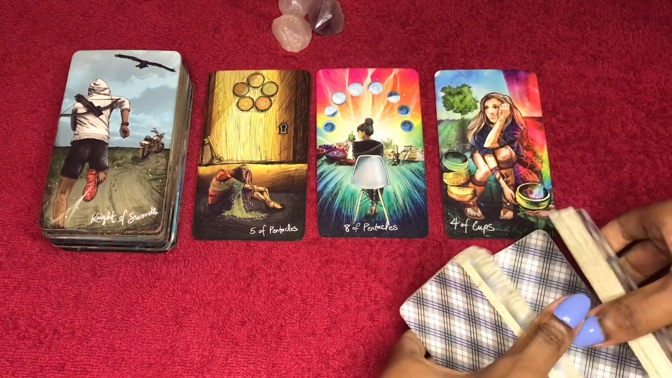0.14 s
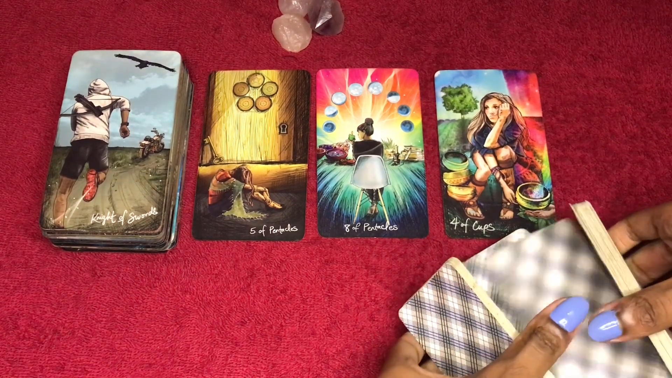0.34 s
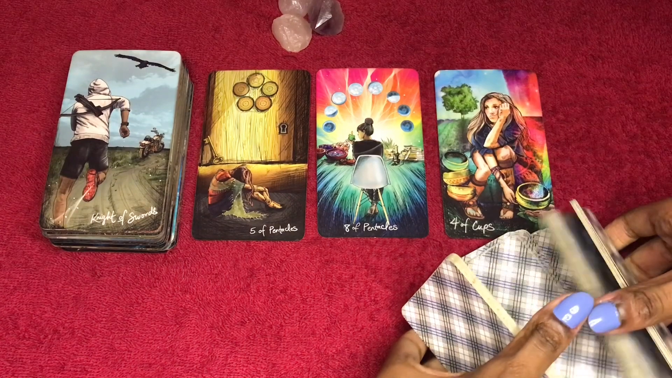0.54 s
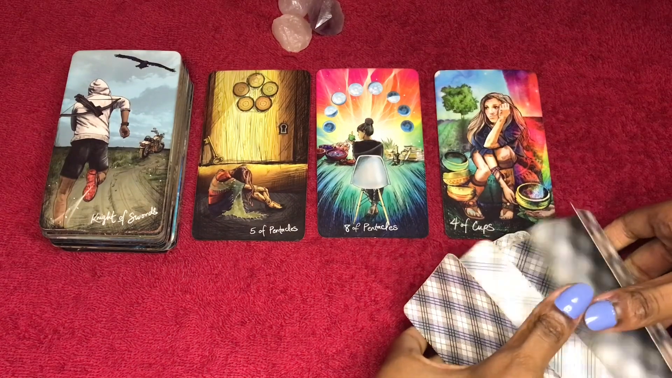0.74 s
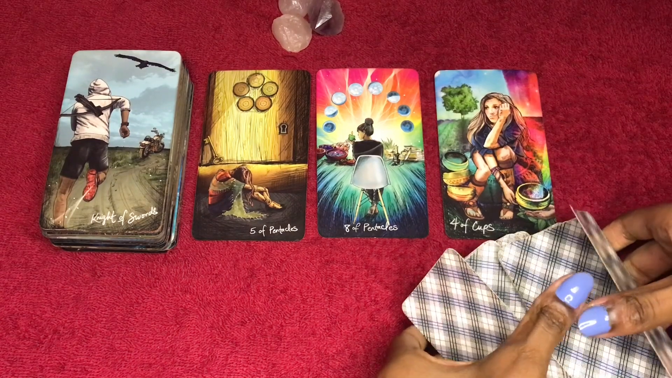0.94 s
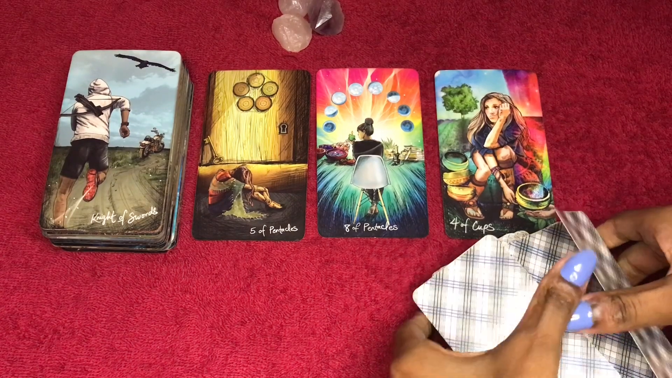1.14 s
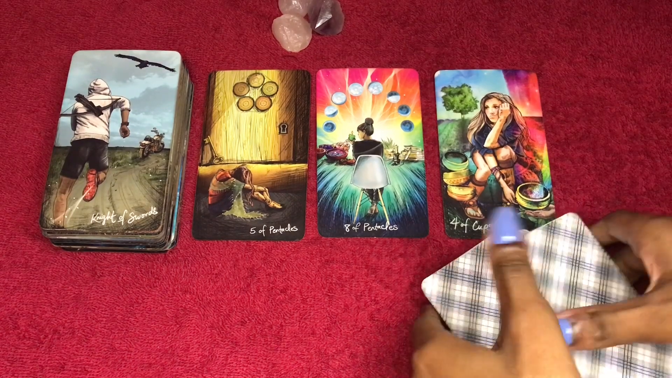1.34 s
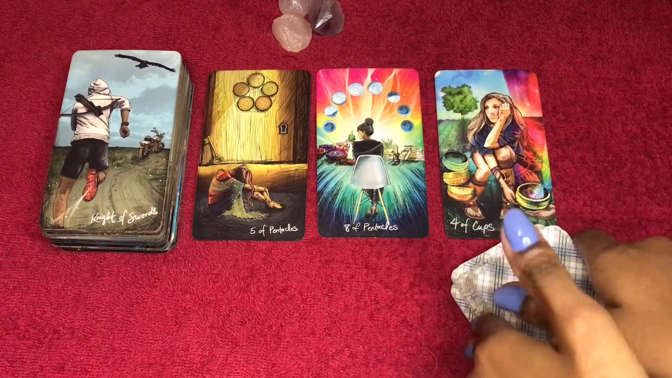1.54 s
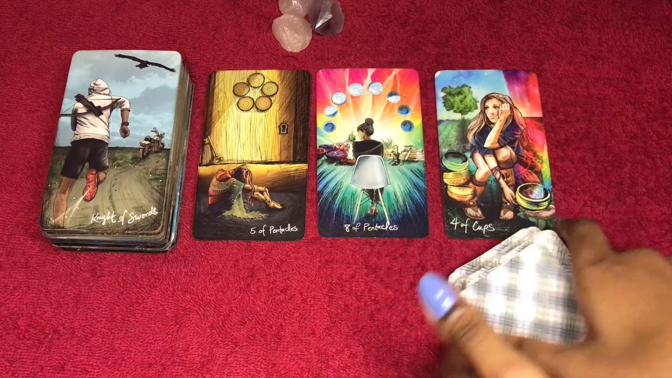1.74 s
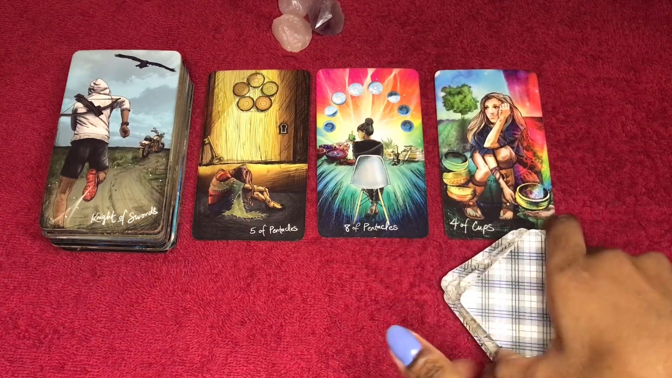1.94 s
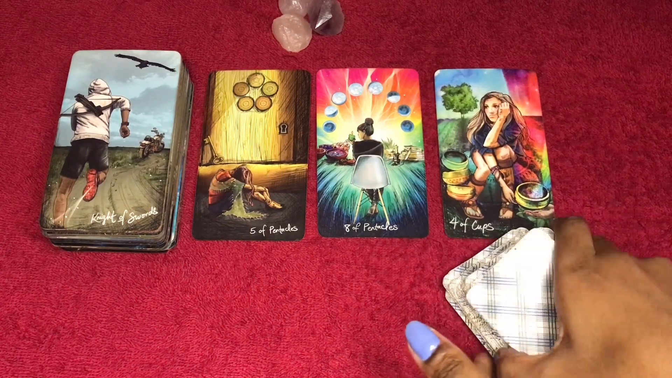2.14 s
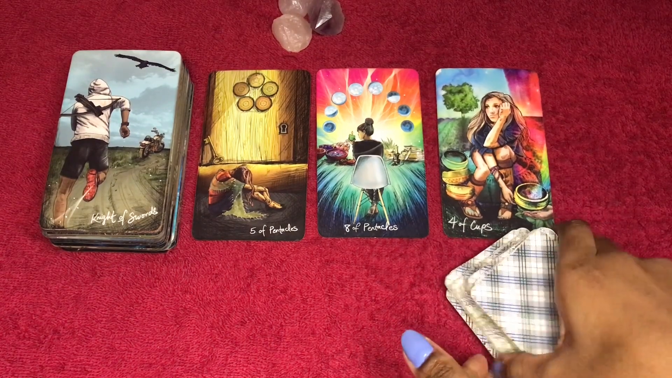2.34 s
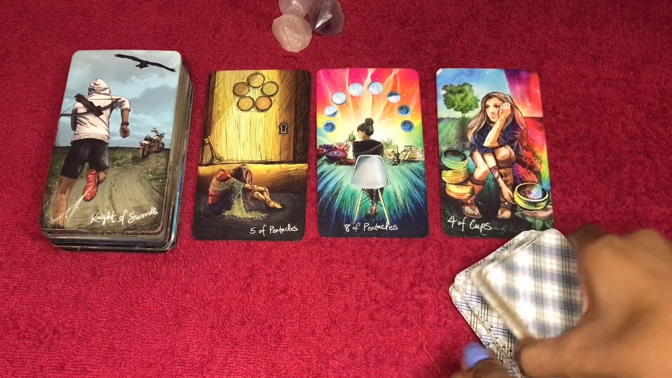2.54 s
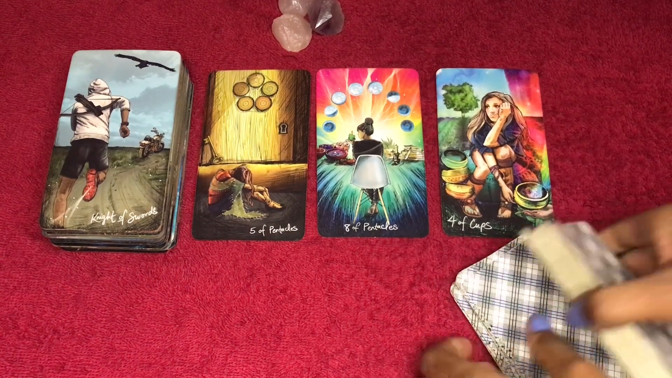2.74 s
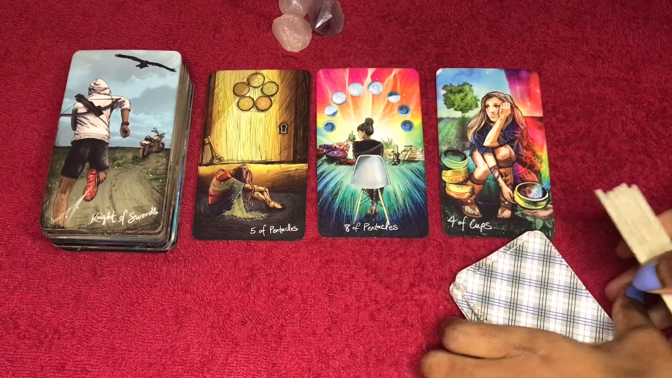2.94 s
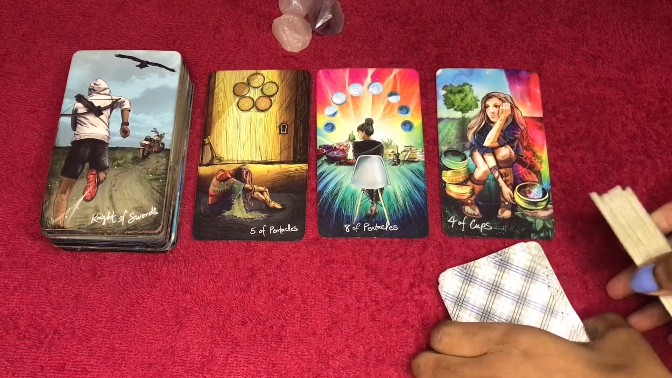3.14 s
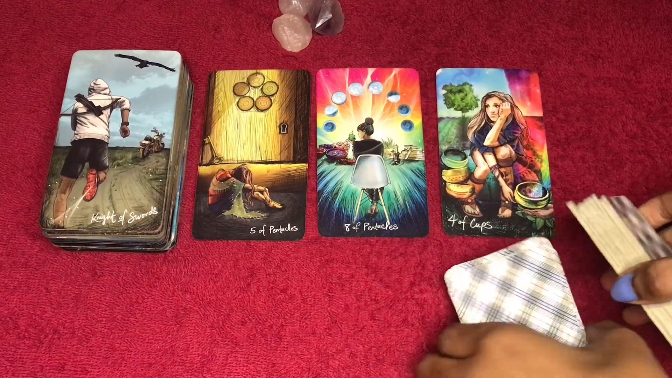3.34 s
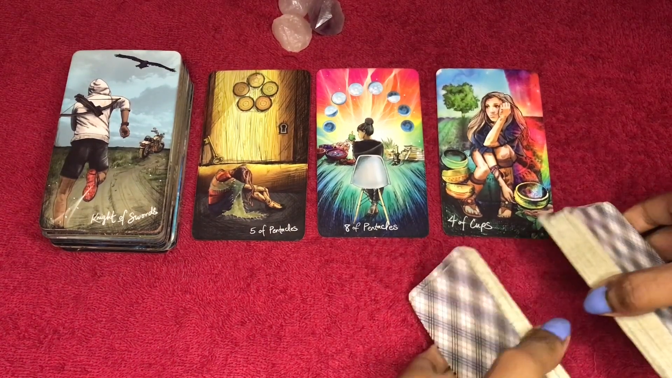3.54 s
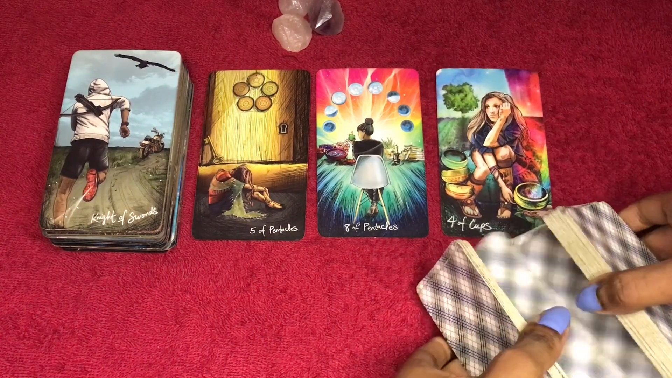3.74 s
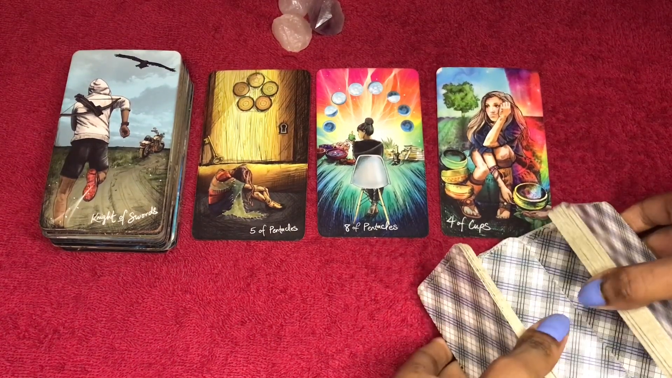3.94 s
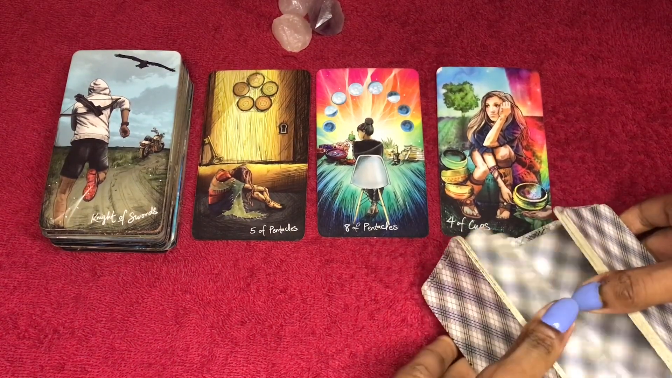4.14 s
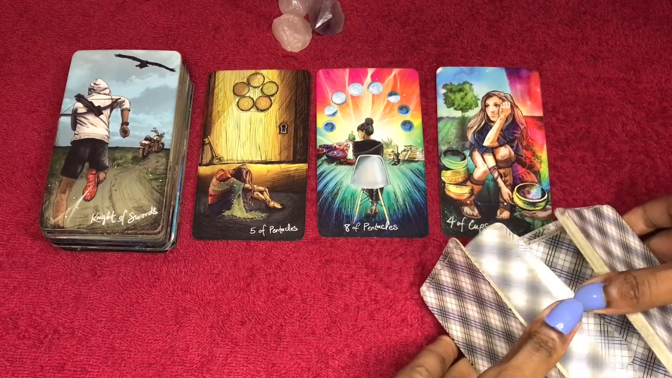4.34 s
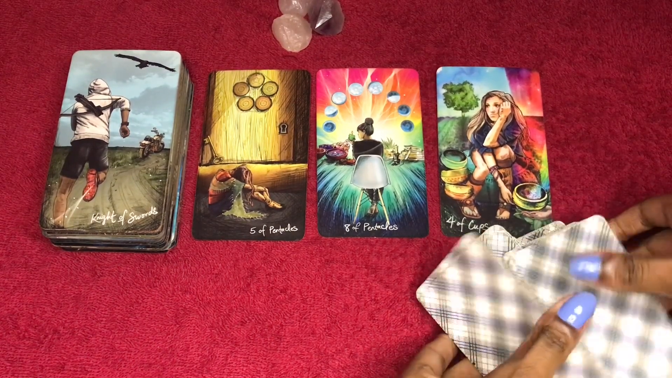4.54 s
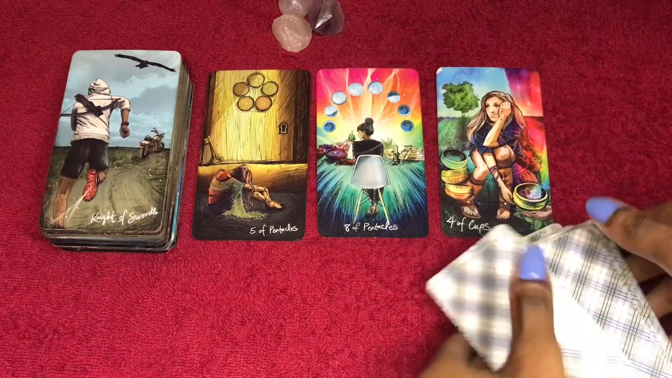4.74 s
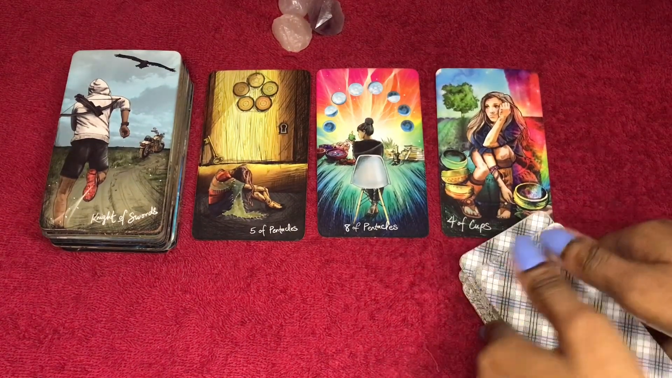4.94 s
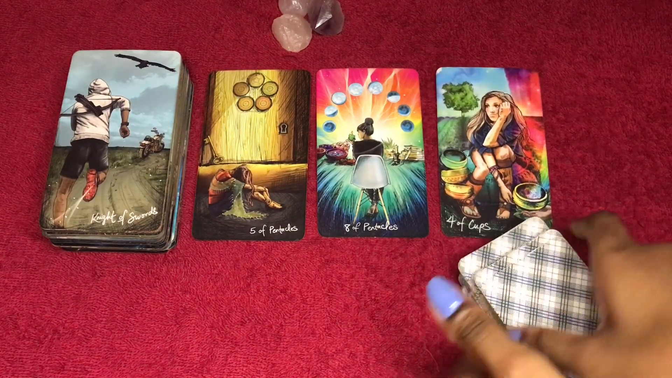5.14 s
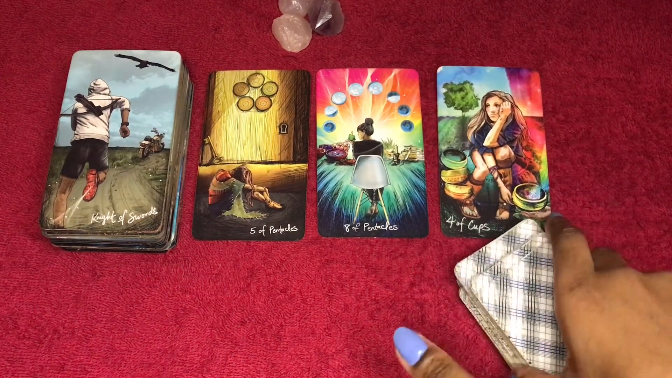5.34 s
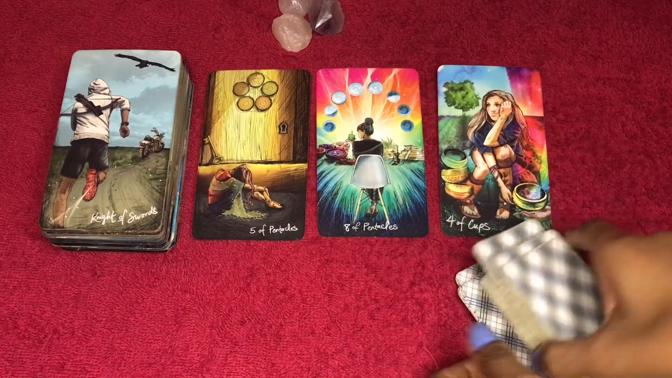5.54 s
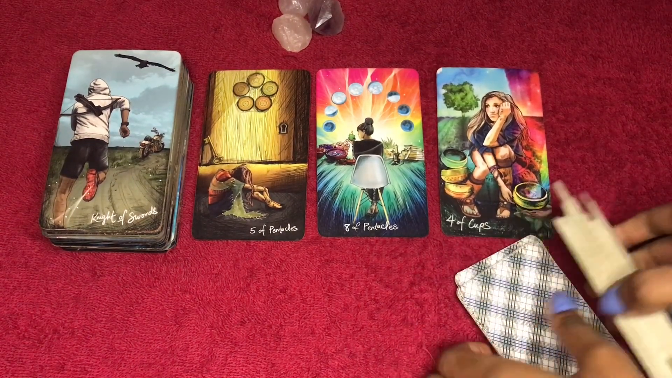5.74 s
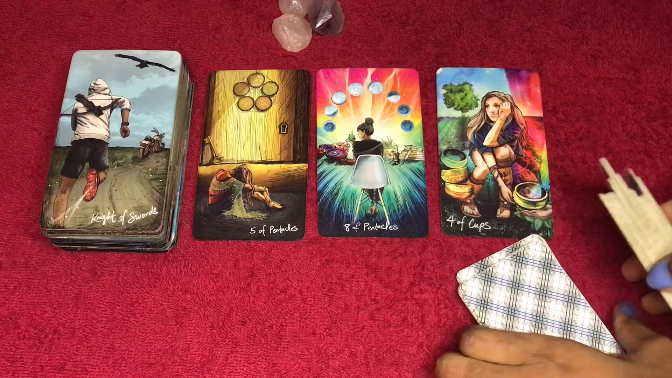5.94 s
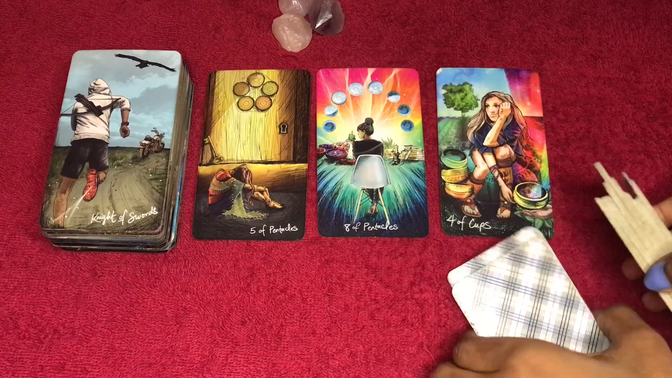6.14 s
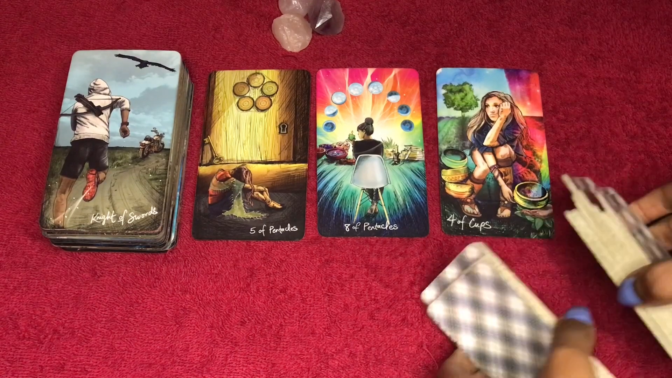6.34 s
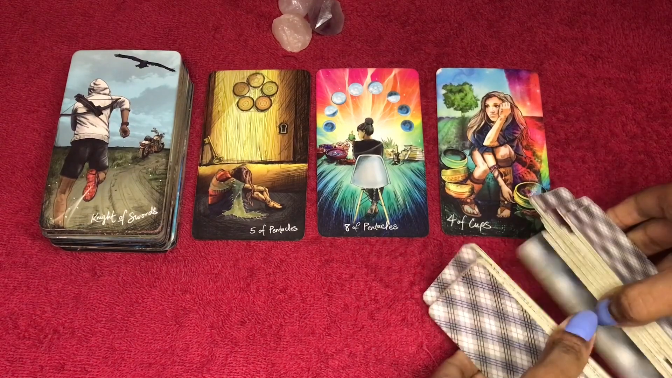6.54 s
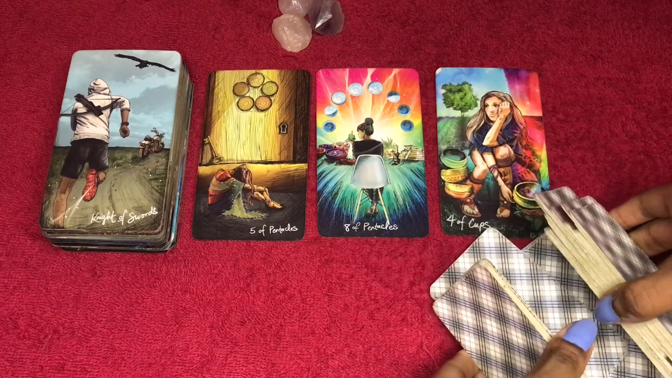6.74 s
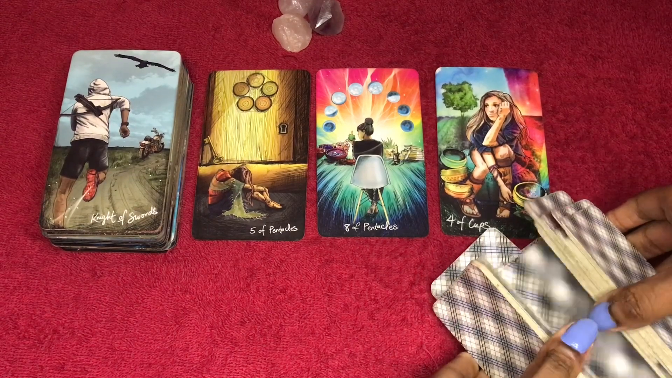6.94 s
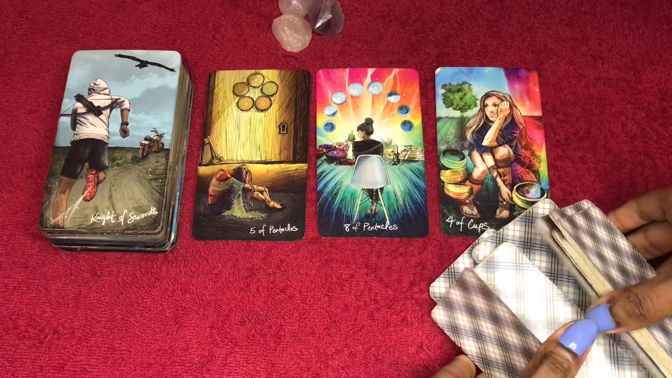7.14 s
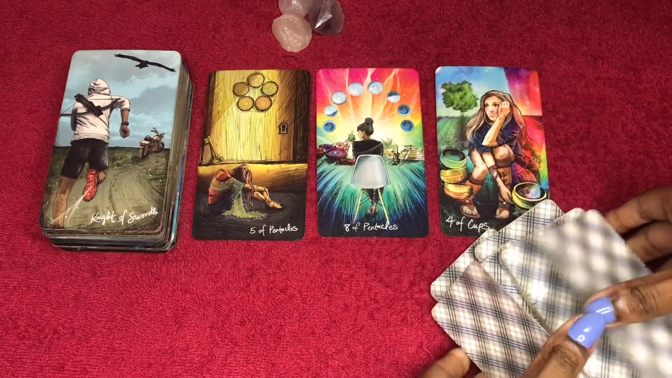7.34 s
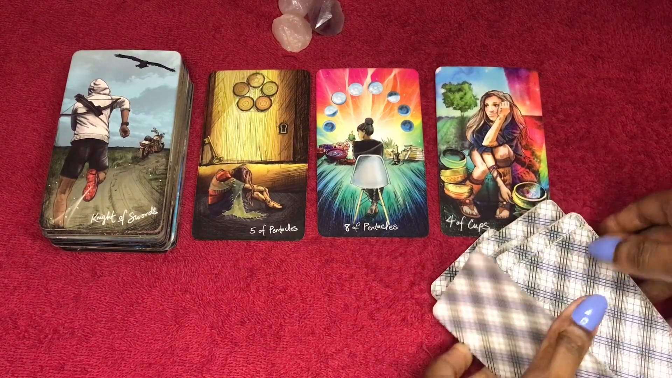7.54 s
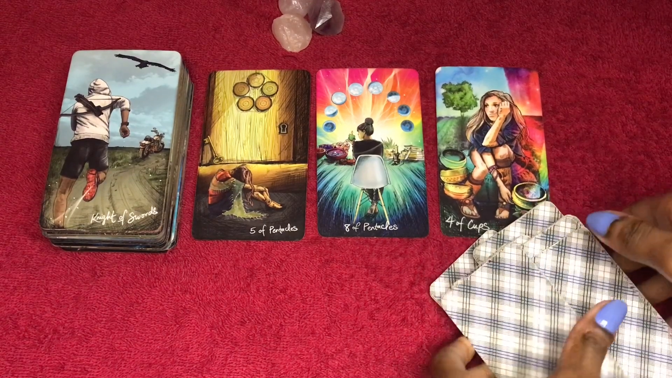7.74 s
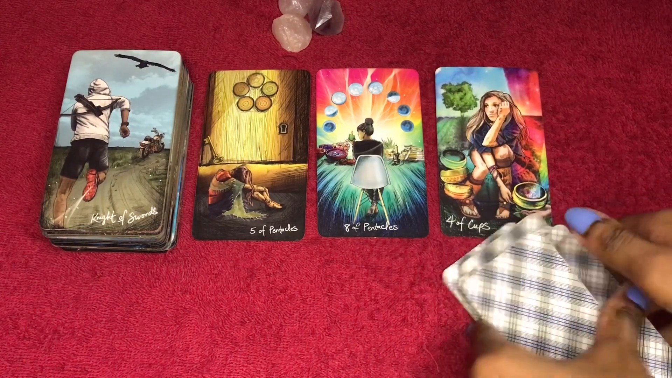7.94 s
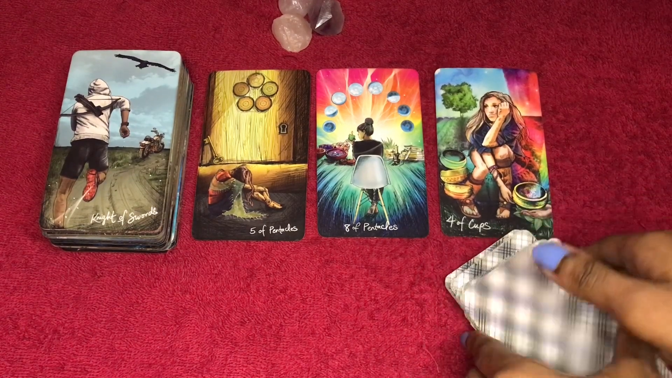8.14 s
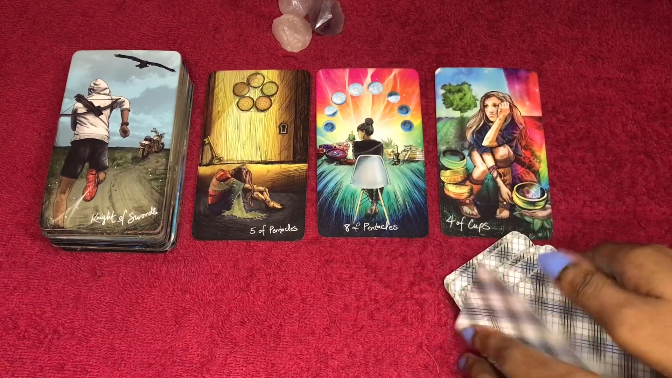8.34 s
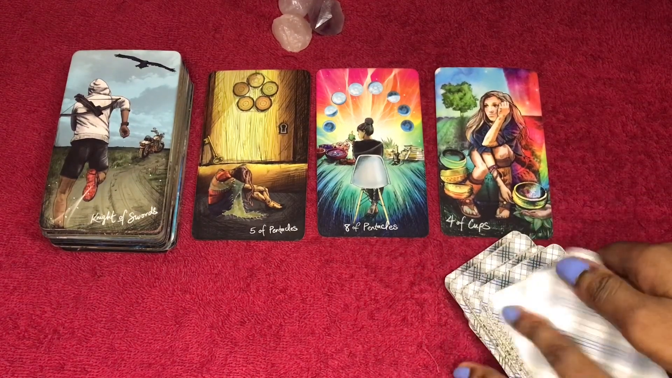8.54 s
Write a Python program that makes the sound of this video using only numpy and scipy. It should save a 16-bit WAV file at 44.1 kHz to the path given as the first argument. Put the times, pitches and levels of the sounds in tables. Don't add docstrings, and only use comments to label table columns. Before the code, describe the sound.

Three irregular bouts of overhand card shuffling, heard close and dry in a small quiet room. Each begins with crisp clicks, edge snaps and hollow packet taps, then thins into light brushing and scraping. The middle bout has the sharpest crack; the last ends with a hard short scrape and more snaps. Dull table thumps lie underneath, over faint rumble, hiss and a distant motor hum.

```python
import sys
import numpy as np
from scipy import signal
from scipy.fft import rfft, irfft, next_fast_len
from scipy.io import wavfile
from scipy.ndimage import uniform_filter1d

SR = 44100
rng = np.random.default_rng(int(sys.argv[2]) if len(sys.argv) > 2 else 0)


def int16_out(signal):
    q = np.round(np.clip(np.atleast_2d(signal).T, -1, 1) * 32767)
    wavfile.write(sys.argv[1], SR, q.astype(np.int16))


def magnitude_from_level(level_db):
    exponent = np.asarray(level_db, float) / 20
    return 10 ** exponent


N = 378819


def band(x, hz, width_hz):
    width_hz = min(width_hz, .4 * SR)
    b, a = signal.iirpeak(min(hz, .45 * SR), hz / width_hz, SR)
    return signal.lfilter(b, a, x)


def unit(x):
    return x / np.sqrt(np.mean(x ** 2) + 1e-18)


def add(track, start_s, sound, peak_db):
    i = int(start_s * SR)
    part = sound[:N - i]
    track[i:i + len(part)] += part * magnitude_from_level(peak_db) / np.max(np.abs(sound))


def walk(rate_hz):
    hold = int(SR / rate_hz)
    steps = np.repeat(rng.standard_normal(N // hold + 1), hold)
    return 2 * uniform_filter1d(uniform_filter1d(steps, hold), hold)[:N]


def card(force, ring_hz, top_db, ring_width=0.13, paper_db=-2, paper_hz=3200, push=0):
    width_hz = ring_width * ring_hz
    ring = band(band(force + push, ring_hz, width_hz), ring_hz, 9.7 * width_hz)
    paper = band(band(force, paper_hz, 6800), paper_hz, 7700) + 0.17 * band(force, 5800, 900)
    edge = band(band(force, 10000, 11000), 9000, 12500)
    return unit(ring) + magnitude_from_level(paper_db) * unit(paper) + magnitude_from_level(top_db - 8.5) * unit(edge)


def snaps():
    # start_s, peak_db, ring_hz, top_db, paper_db
    cracks = [(0.2685, -20, 2470, -13, 0), (0.3757, -20, 5460, 0, 4), (0.7735, -22, 1530, -28, -2),
              (0.7878, -27, 1400, -8, 2), (8.2128, -11, 6300, -10, 0), (1.132, -23, 5500, 0, -8),
              (1.3596, -12, 4200, -10, 1), (1.918, -33, 2860, -14, 2), (3.772, -12, 3280, -6, -3),
              (3.808, -30, 13000, 4, 0), (3.8183, -21.5, 3060, -2, 7), (4.2062, -5, 3860, 9, 6),
              (4.2093, -17, 5800, -4, 1), (4.4052, -37.5, 4390, -17, 1), (4.6412, -25, 8400, 7, -4),
              (4.6588, -38, 7500, 0, 6), (7.2327, -8, 2880, 12, 5), (6.952, -11, 3800, -8, 10),
              (7.0572, -26.5, 3560, 2, 6), (7.0652, -22.5, 5140, -14, 12), (7.0927, -16.5, 1760, -15, 2),
              (7.1531, -11.5, 6300, 3, 6), (7.9275, -14.5, 3130, -25, -7), (7.966, -25, 4240, -22, -2),
              (7.9714, -13, 3560, 2, 0), (8.214, -15, 3220, -12, 2), (8.2668, -28, 3300, -30, -1),
              (8.3525, -33, 4100, -5, 4), (8.3562, -17.5, 3300, -20, -1), (8.5812, -27, 2800, -22, 2)]
    # start_s, peak_db, ring_hz, top_db, paper_db
    flicks = [(0.263, -23, 5900, 8, 7), (0.630, -29, 3990, 0, 6), (0.635, -18.5, 3970, -3, -5),
              (0.7702, -26, 7700, 4, 7), (0.8035, -22, 1800, 6, 8), (0.8165, -26.5, 2400, 4, 8),
              (1.3547, -26, 2350, -8, -2), (1.5272, -28.5, 3340, -17, -6), (2.1052, -29.5, 2300, 16, 6.5),
              (2.5006, -36.5, 8620, 12, 13), (3.768, -35, 3280, -10, 7), (4.1497, -17.5, 2500, 3, 1.5),
              (4.1656, -23, 4350, -7, 6), (4.1703, -13, 4050, -12, -2), (4.475, -28, 3190, 12, 2),
              (4.4836, -23, 8820, 13, 4), (4.4943, -24.5, 1590, -11, -0.5), (4.527, -17, 3600, -30, -21),
              (4.629, -22, 2400, -9, 3), (6.619, -31, 1500, 6, 6), (7.0095, -29, 5390, 10, 6),
              (7.1208, -34, 4450, 12, 6), (7.2344, -15.5, 4970, 18, 8), (7.3301, -21, 2980, 2, 5),
              (7.338, -21, 3100, -20, -3), (7.3596, -21.5, 2100, -7, 2), (8.199, -24, 2800, -20, -5),
              (1.1242, -14.5, 6000, 12.5, 6.5), (8.273, -17, 3220, 4, 0), (8.279, -26, 3500, -6, 7)]
    # start_s, peak_db, ring_hz, top_db
    ticks = [(0.3651, -38, 5090, 3), (0.6837, -35, 2140, 9), (1.373, -32, 6000, 0),
             (1.5117, -34, 3260, -10), (1.519, -40, 3300, -10), (2.1613, -35, 2900, 10),
             (3.6626, -49, 3590, 3), (3.7201, -31.5, 1500, -6), (3.829, -36, 2500, -15),
             (4.1402, -30, 1500, -14), (4.539, -30, 4480, 0), (4.6761, -39, 8500, 3),
             (4.7878, -42, 6970, 3), (4.8384, -31.5, 2330, 3), (6.68, -38, 2600, 0), (6.698, -37, 3230, -2),
             (6.928, -28.5, 3530, -3), (7.071, -36, 3140, -6), (8.317, -40, 2440, 8),
             (8.425, -32.5, 2780, 3), (8.4554, -32, 2600, 3), (6.7122, -38, 3000, -15),
             (7.3257, -31, 4800, -10), (4.4115, -48, 5000, 0), (6.9626, -37, 3000, -3),
             (7.0965, -24, 2800, 3), (1.479, -40, 3500, 0), (8.386, -36, 3000, 0), (7.9665, -20, 3000, 0)]
    # start_s, peak_db, ring_hz
    pricks = [(0.325, -46, 5000), (0.38, -42, 13000), (0.621, -41, 9000), (0.642, -35, 12000),
              (0.689, -41, 7000), (0.735, -45, 12000), (0.7985, -35, 6000), (0.81, -37, 13000),
              (1.246, -46, 12000), (1.467, -40, 11000), (2.471, -38, 12000), (3.046, -38, 14000),
              (3.0645, -39, 11100), (3.8215, -33, 9000), (3.84, -46, 12500), (3.907, -51, 7000),
              (4.011, -49, 6540), (4.115, -46, 10000), (4.158, -36, 8000), (4.1742, -33, 8000),
              (4.318, -49, 13000), (4.6235, -40, 9500), (4.634, -33, 6000), (4.638, -38, 11000),
              (4.646, -38, 9000), (4.669, -43, 9000), (6.673, -45, 13000), (6.694, -40, 7500),
              (6.774, -49, 6500), (7.349, -37, 11000), (8.204, -36, 9000), (8.217, -34, 9000),
              (4.2064, -7, 7700), (4.1493, -19, 9000), (7.7158, -38, 5530)]
    release_s, release_db = .0004, 5
    bounce_late_s, bounce_db = 0.0031, -24

    # top_db, paper_db, length_ms
    slips = [row + (0.83,) for row in cracks]
    slips += [row + (1.87,) for row in flicks]
    slips += [row + (4, 1.1) for row in ticks]
    slips += [row + (11, -4, 0.51) for row in pricks]
    near, around, t = np.zeros(N), np.zeros(N), np.arange(512) / SR
    impulse = 1. * (t == 0)
    release = np.arange(len(t)) == int(release_s * SR)
    draws = rng.standard_normal((len(slips), 2, 512))
    for (start_s, peak_db, ring_hz, top_db, paper_db, length_ms), (noise, size) in zip(slips, draws):
        x = t / (length_ms * 0.00035)
        force = noise * magnitude_from_level(5.74 * size) * x ** 1.47 * np.exp(-x)
        push = magnitude_from_level(release_db) * np.sqrt(np.sum(force ** 2)) * release
        snap = card(force, ring_hz, top_db, paper_db=paper_db, push=push)
        add(near, start_s - .0005, snap, peak_db + 1.5)
        bounce = card(force * np.sign(size), ring_hz, top_db + 11, paper_db=paper_db - 5)
        add(near, start_s + bounce_late_s, bounce, peak_db + bounce_db)
        blend = card(impulse, ring_hz, top_db + 3, ring_width=0.77, paper_db=1.2 * paper_db - 4)
        add(around, start_s, blend, peak_db + 10 * np.log10(length_ms) + 5.0)
    return near, around


def blow(hz, push_cycles, ring_cycles, rough):
    cycles = np.arange(len(rough)) / SR * hz
    swell = 1 - np.exp(-cycles / push_cycles)
    return np.sin(2 * np.pi * cycles + rough) * swell * np.exp(-cycles / ring_cycles)


def knocks():
    # start_s, peak_db, hollow_hz, ring_cycles, crunch_db
    packets = [(0.2664, -33, 770, 1.5, -8), (0.3812, -15, 668, 1.1, -30), (0.636, -30.5, 720, 1, -8),
               (0.6419, -35, 288, 1, -10), (0.7744, -16, 900, 1.4, -20), (0.787, -23, 600, .8, -15),
               (0.8045, -27, 640, 2, -10), (1.1275, -28, 660, 5, -12), (3.7235, -28, 550, 1.2, -20),
               (3.7808, -30.5, 690, 1, -8), (3.8121, -31, 373, 1, -10), (3.8192, -23, 700, 1, -8),
               (4.1503, -19, 757, 1, -10), (4.1712, -19, 770, 1.2, -15), (4.2277, -27, 533, .6, -20),
               (4.4118, -24, 520, .6, -25), (4.481, -30, 700, 1.2, -10), (4.485, -27, 453, 1, -8),
               (4.528, -28, 600, 1, -10), (6.6235, -39, 500, .8, -8), (6.7015, -22, 420, 1, -30),
               (6.941, -26, 360, 2, -25), (6.9515, -30, 510, .7, -10), (7.0097, -39, 422, 1, -8),
               (7.0955, -23, 500, 1.5, -12), (7.2345, -29, 700, 2, -8), (7.3252, -27, 310, 1.3, -8),
               (7.3401, -28, 745, 1, -8), (7.4173, -32, 420, .8, -20), (7.9278, -35, 480, 1, -8),
               (6.6995, -27, 750, .8, -20), (6.7068, -26, 380, 1, -25), (3.8228, -25, 800, 2, -25),
               (0.2755, -34, 750, 1.2, -12), (6.929, -36, 700, 1.5, -8), (6.9375, -29, 900, 1.2, -6),
               (0.7995, -34, 800, 1.2, -12), (4.47, -38, 700, 2, -12), (8.3575, -39, 650, 4, -25),
               (4.4945, -27, 600, .8, -10)]
    # start_s, peak_db
    settles = [(1.3558, -31), (1.3889, -39), (2.1058, -38), (3.7362, -51), (4.2148, -29), (4.1405, -38),
               (4.63, -39), (7.068, -40), (6.7213, -42), (6.986, -37), (7.152, -29), (7.966, -34),
               (8.2001, -32), (8.211, -40), (8.2266, -38), (8.2728, -34.5), (8.386, -44), (0.391, -36),
               (4.839, -40), (8.5823, -33)]
    landings = packets + [row + (650, 1.1, -8) for row in settles]

    near, around, t = np.zeros(N), np.zeros(N), np.arange(1024) / SR
    impulse = 1. * (t == 0)
    draws = rng.standard_normal((len(landings), 1024))
    for (start_s, peak_db, hz, ring_cycles, crunch_db), noise in zip(landings, draws):
        rough = 0.25 * unit(uniform_filter1d(noise, size=60))
        crunch = unit(band(band(noise, 0.77 * hz, 0.4 * hz), 1.43 * hz, 2.2 * hz)) * np.exp(-t / 0.0037)
        pop = blow(hz, 0.3, 0.8 * ring_cycles, rough)
        add(near, start_s - .0005, pop + magnitude_from_level(crunch_db) * crunch, peak_db + 1.1)
        add(around, start_s, band(band(impulse, hz, 0.9 * hz), hz, 2.2 * hz), peak_db - 1.5)
    return near, around


def stroke(crest_s, rise_ms, fall_ms):
    i, reach = int(crest_s * SR), int(250 * max(rise_ms, fall_ms, 5))
    near = np.arange(max(i - reach, 0), min(i + reach, N))
    ms = (near - i) * 1000 / SR
    x = ms / np.where(ms < 0, max(rise_ms, 1), max(fall_ms, 1))
    return near, np.exp(-.9 * x ** 2) + 0.2 * np.exp(-.7 * np.abs(x))


def rubs():
    # crest_s, length_ms, level_db, ring_hz
    brushes = [(0.271, 5.5, -36, 2390), (1.482, 45, -43.5, 5500), (1.844, 14, -55, 1890),
               (1.947, 5.9, -37, 2430), (2.105, 8.6, -43, 2420), (2.377, 19, -52, 3500),
               (3.661, 4.5, -40.5, 3480), (4.4615, 4.3, -31.5, 5000), (4.805, 51, -41.5, 5770),
               (6.032, 42, -51, 4500), (6.57, 4.6, -48, 2370), (6.76, 4, -44, 9000), (7.595, 16, -38, 6650),
               (8.23, 25, -42, 2600), (8.407, 21, -39, 6200), (8.53, 33, -39, 3250)]
    # crest_s, length_ms, level_db, ring_hz
    scrapes = [(0.804, 1.8, -30, 4500), (0.645, 12, -43, 3830), (8.143, 10.3, -29, 3600),
               (8.158, 4.9, -20, 3040), (7.349, 3, -42, 2000), (0.992, 5, -52, 4340),
               (1.276, 10, -52, 2430), (1.4, 35, -56, 2960), (1.516, 4.9, -51, 3350),
               (1.918, 5.3, -44, 2400), (2.2, 130, -54, 6500), (3.185, 47, -53.5, 2190),
               (4.409, 21, -51, 1630), (4.488, 5.2, -28, 6000), (5.255, 35, -55, 4500),
               (6.938, 2.8, -27, 3800), (7.094, 3.2, -31, 3880), (7.336, 6, -30.5, 3220),
               (7.48, 12, -53, 2400), (7.529, 15, -50, 2280), (7.654, 19, -53, 4200), (7.7, 87, -54, 2500),
               (7.716, 4.4, -34, 5340), (7.821, 17, -43, 2810), (7.95, 6.5, -43.5, 1500),
               (8.175, 1.9, -17, 6800), (8.588, 5.1, -33, 2980)]
    # crest_s, level_db, ring_hz
    skids = [(3.772, -40, 3380), (4.215, -50, 2500), (4.63, -45, 4440), (7.163, -36.5, 3600),
             (7.235, -43, 2980), (7.927, -35.5, 2900), (7.968, -29.5, 3750), (0.386, -52, 1100),
             (0.778, -45, 1720), (1.129, -42, 2280), (3.823, -39.5, 1500), (4.153, -36, 1990),
             (4.176, -38.5, 2560), (4.532, -53, 2500), (6.624, -51, 1300), (6.703, -51, 1200),
             (7.098, -41, 1500), (1.365, -46, 3000), (0.806, -42, 1500), (0.822, -45, 1700),
             (7.342, -44, 900)]
    # crest_s, length_ms, level_db
    drags = [
        (1.46, 40, -49),
        (1.93, 28, -49.5),
        (4.5, 49, -48.5),
        (4.81, 39, -48),
        (7.52, 83, -53),
        (7.78, 200, -58.5),
        (7.9, 23, -51),
        (8.3, 140, -47.5),
        (8.53, 42, -76),
    ]
    # crest_s, rise_ms, level_db, ring_hz, top_db
    jams = [
        (1.123, 2.6, -48, 3500, -4),
        (1.356, 8, -46, 2600, -8),
        (1.525, 44, -48.5, 3280, -7),
        (2.503, 37, -40.5, 3780, 23),
        (3.068, 22, -43.5, 5470, 16),
        (8.1665, 5, -16, 2800, -11),
        (8.16, 4, -21, 3200, -11),
        (3.81, 25, -44, 3500, 0),
    ]
    # crest_s, length_ms, level_db, gap_hz
    squeaks = [(1.919, 5.6, -49, 2460), (1.946, 5.6, -43.5, 2340), (2.108, 11, -44.5, 2385),
               (2.138, 11, -54, 2540), (7.5, 23, -61, 2300), (7.785, 12, -58, 2500), (7.82, 11, -56, 2900),
               (8.54, 5.4, -46, 3400), (8.14, 6, -38, 2100), (8.166, 2, -22, 2900), (8.161, 2.5, -25, 3500),
               (1.3605, 1.1, -28, 2400), (0.7748, 1.1, -29, 1900), (0.8047, 1.1, -32, 1800),
               (4.6292, 1.2, -36, 4400), (7.361, 1.3, -36, 3150), (4.2066, 1.1, -24, 2200),
               (4.1715, 1.2, -30, 2200), (3.8198, 1.2, -33, 1500), (6.701, 1.5, -40, 2600),
               (7.2345, 1.3, -29.5, 2880), (4.463, 5, -44, 2100), (8.53, 5, -48, 3700),
               (7.096, 1.1, -38, 4120)]

    # crest_s, rise_ms, fall_ms, level_db, ring_hz, top_db, body_db
    strokes = [(s, ms, 0.98 * ms, db, hz, 15, -14) for s, ms, db, hz in brushes]
    strokes += [(s, ms, 0.72 * ms, db, hz, 3, -12.5) for s, ms, db, hz in scrapes]
    strokes += [(s, 3, 23, db, hz, -7, -5.5) for s, db, hz in skids]
    strokes += [(s, ms, 0.99 * ms, db, 2200, 1, -0.5) for s, ms, db in drags]
    strokes += [(s, ms, 0.38 * ms, db, hz, top_db, -12.5) for s, ms, db, hz, top_db in jams]
    scatter_db, flicker_db = 3.8, 1.2
    out = np.zeros(N)
    grit = rng.standard_normal(N) * magnitude_from_level(scatter_db * rng.standard_normal(N) + flicker_db * walk(250))
    for crest_s, rise_ms, fall_ms, level_db, ring_hz, top_db, body_db in strokes:
        near, pressure = stroke(crest_s, rise_ms, fall_ms)
        face = card(grit[near], ring_hz, top_db, ring_width=0.4, paper_db=1.0, paper_hz=3940)
        body = band(band(grit[near], 590, 2600), 710, 4000)
        out[near] += magnitude_from_level(level_db - 6.5) * pressure * (unit(face) + magnitude_from_level(body_db) * unit(body))
    for crest_s, length_ms, level_db, gap_hz in squeaks:
        near, pressure = stroke(crest_s, length_ms, 1.3 * length_ms)
        whistle = band(band(grit[near], gap_hz, 0.089 * gap_hz), gap_hz, 0.33 * gap_hz)
        out[near] += magnitude_from_level(level_db - 0.5) * pressure * unit(whistle)
    return out


def thumps():
    # start_s, peak_db, sway_hz
    blows = [(0.277, -23, 72), (0.318, -41, 85), (0.383, -35, 93), (0.648, -42, 93), (0.782, -32.5, 93),
             (0.825, -36, 93), (0.879, -40, 85), (1.92, -41, 93), (3.074, -35, 85), (3.729, -31, 62),
             (3.782, -29, 72), (3.826, -29, 90), (3.913, -38, 93), (4.157, -33, 93), (4.189, -29.5, 80),
             (4.222, -33.5, 93), (4.493, -38, 93), (4.527, -39, 93), (6.634, -28, 66), (6.705, -28, 95),
             (6.722, -34, 70), (6.96, -30, 80), (7.023, -42, 93), (7.102, -28.5, 105), (7.156, -34, 93),
             (7.183, -40, 93), (7.259, -37, 93), (7.335, -29, 93), (7.97, -51, 93), (8.2, -57, 93)]
    out = np.zeros(N)
    for start_s, peak_db, sway_hz in blows:
        add(out, start_s - .001, blow(sway_hz, 0.12, 0.8, np.zeros(8192)), peak_db + 1.5)
    return out


def table(x):
    # mode_hz, level_db, t60_s
    modes = [
        (66.9, -16, 0.39),
        (211, -19, 0.076),
        (300, -21, 0.04),
        (660, -21, 0.04),
        (867, -29, 0.058),
    ]
    out = 0
    for mode_hz, level_db, t60_s in modes:
        out = out + magnitude_from_level(level_db + 17.5) * band(x, mode_hz, np.log(1000) / (np.pi * t60_s))
    return out


def room(x):
    # centre_hz, level_db, t60_s
    tail_bands = [
        (268, -16.5, 0.14),
        (800, -12.5, 0.26),
        (2500, -27, 0.33),
        (6000, -20, 0.49),
        (12000, -18.5, 0.25),
    ]
    t = np.arange(SR // 2) / SR
    tail = np.zeros(len(t))
    for hz, level_db, t60_s in tail_bands:
        noise = band(rng.standard_normal(len(t)), hz, 1.48 * hz)
        tail += magnitude_from_level(level_db) * noise * magnitude_from_level(-60 * t / t60_s) * np.sqrt(SR / hz / t60_s / 2000)
    tail *= magnitude_from_level(-10.0) * np.clip((t - .002) / 0.00021, 0, 1)
    tail[int(.0033 * SR)] += magnitude_from_level(-19.5)
    return signal.fftconvolve(x, tail)[:N]


def floor():
    # freq_hz, density_db
    spectrum_db = [
        (15, -49),
        (28, -19),
        (59, -0.5),
        (140, -10),
        (600, -10),
        (1700, -16.5),
        (4800, -23),
        (17000, -25),
    ]
    # time_s, level_db
    rumble_db = [(0, -55), (1, -56.5), (1.7, -56), (2.4, -56.5), (3.6, -58), (4.4, -53.5), (5.4, -57.5),
                 (6.5, -55.5), (7.2, -52), (7.6, -57), (8.6, -58)]
    # centre_hz, width_hz, level_db
    drone = [
        (487, 4.1, -69),
        (1210, 14, -96),
    ]
    # centre_s, half_length_s, pitch_hz, level_db
    motor = [
        (6.117, 0.16, 217.3, -60),
        (6.463, 0.13, 150.8, -53.5),
    ]

    size, t = next_fast_len(N), np.arange(N) / SR
    f = np.maximum(np.fft.rfftfreq(size, 1 / SR), 1)
    hz, db = np.transpose(spectrum_db)
    spectrum = rfft(rng.standard_normal(size)) * magnitude_from_level(np.interp(np.log(f), np.log(hz), db))
    low = 1 / (1 + (f / 140) ** 4)
    rumble = irfft(spectrum * np.sqrt(low), size)[:N]
    hiss = irfft(spectrum * np.sqrt(1 - low), size)[:N]
    out = unit(rumble) * magnitude_from_level(np.interp(t, *np.transpose(rumble_db)) + 3.0)
    out += unit(hiss * magnitude_from_level(.5 * walk(1.61))) * magnitude_from_level(-54.5)
    for hz, width_hz, level_db in drone:
        out += magnitude_from_level(level_db) * unit(band(rng.standard_normal(N), hz, width_hz))
    for centre_s, half_s, pitch_hz, level_db in motor:
        swell = np.exp(-((t - centre_s) / half_s) ** 4)
        out += magnitude_from_level(level_db + 4.0) * swell * np.sin(2 * np.pi * pitch_hz * t + .5 * walk(9.3))
    return out


def scene():
    snap, snap_around = snaps()
    knock, knock_around = knocks()
    thump, rub = thumps(), rubs()
    wood = thump + table(knock + thump)
    echo = room(snap_around + knock_around + rub + wood)
    return (snap + knock + rub + wood + echo + floor())[None]


def roll_off(x):
    return signal.sosfilt(signal.butter(12, 17010, fs=SR, output="sos"), x)


def record(dry):
    # centre_hz, width_hz, depth (0-1)
    dips = [
        (4890, 280, 0.31),
        (7680, 1060, 0.39),
        (10410, 2100, 0.42),
    ]
    x = signal.sosfilt(signal.butter(2, 32, "high", fs=SR, output="sos"), dry)
    for hz, width_hz, depth in dips:
        x = x - depth * band(x, hz, width_hz)
    x = np.tanh(x / .8) * .8
    shelf = signal.ellip(8, .3, 30, 15900, fs=SR, output="sos")
    top = signal.ellip(8, .3, 70, 16900, fs=SR, output="sos")
    return roll_off(signal.sosfilt(np.vstack([shelf, top]), x))


dry = scene()
out = record(dry)
int16_out(out)
```